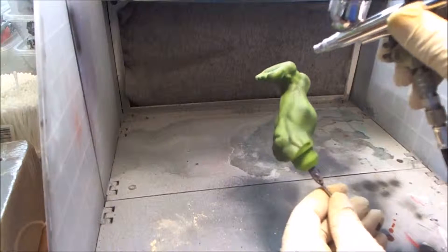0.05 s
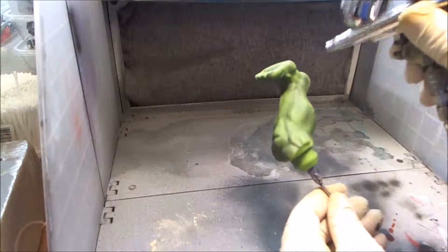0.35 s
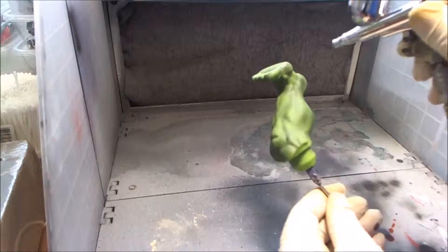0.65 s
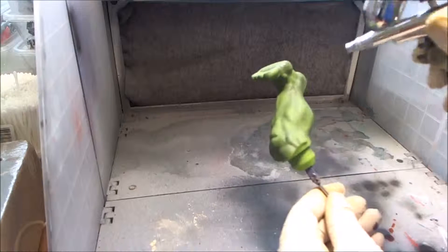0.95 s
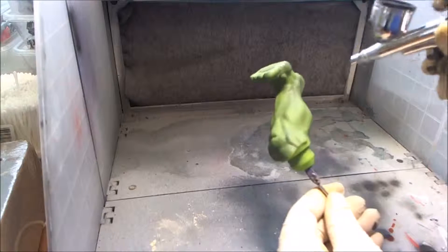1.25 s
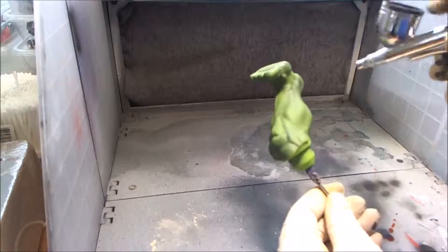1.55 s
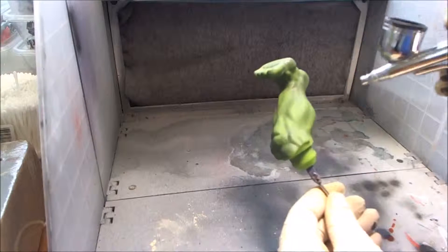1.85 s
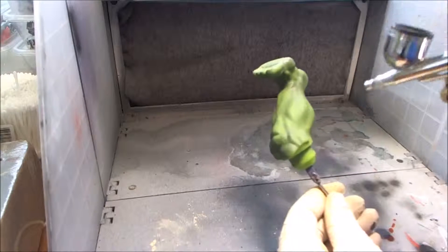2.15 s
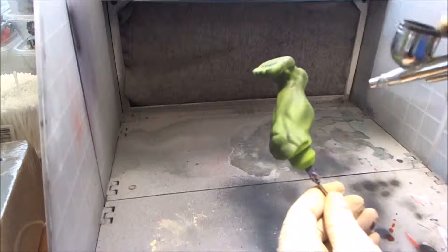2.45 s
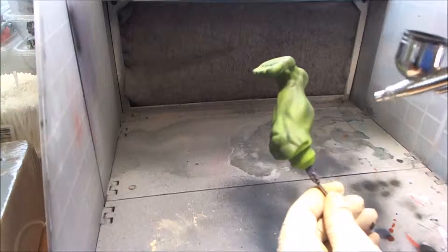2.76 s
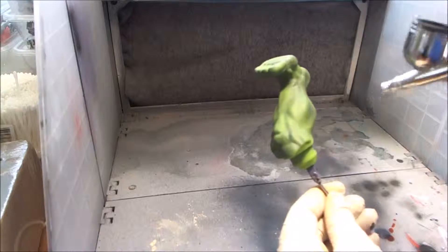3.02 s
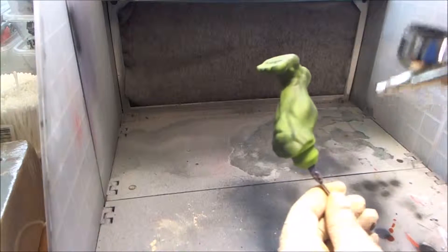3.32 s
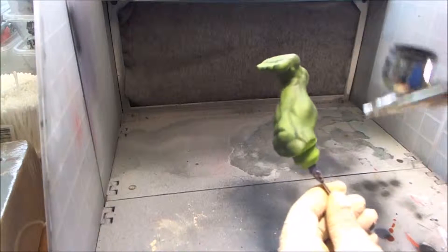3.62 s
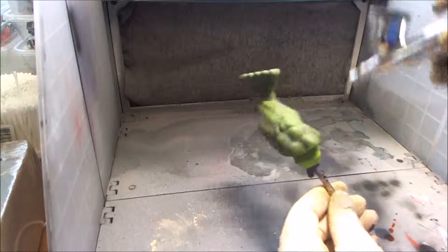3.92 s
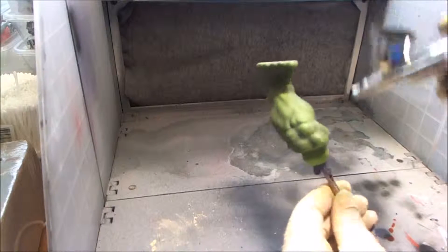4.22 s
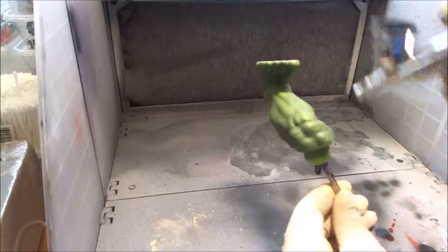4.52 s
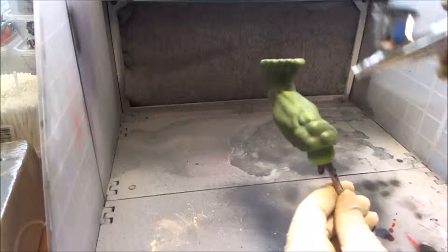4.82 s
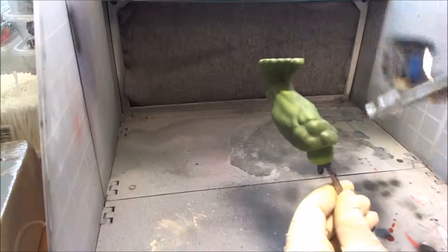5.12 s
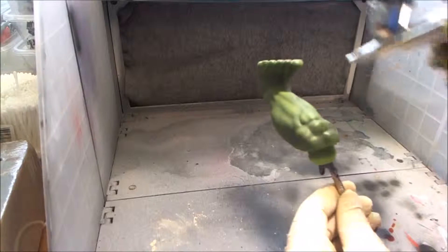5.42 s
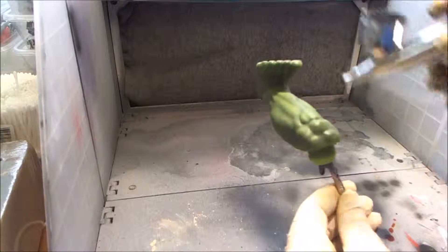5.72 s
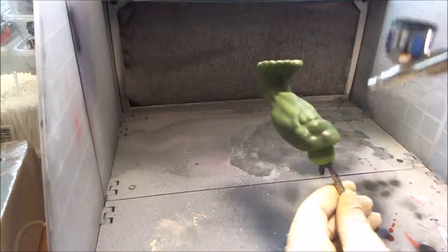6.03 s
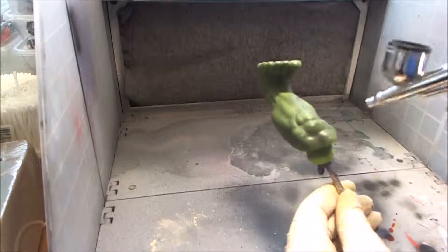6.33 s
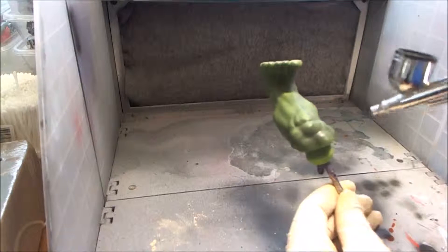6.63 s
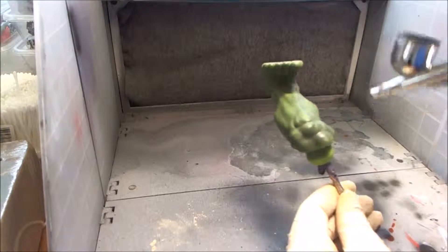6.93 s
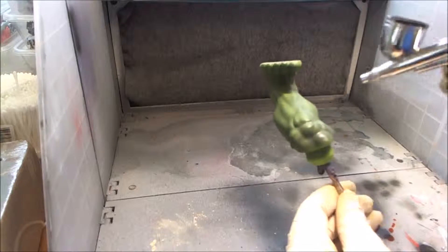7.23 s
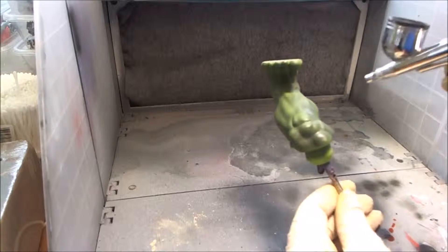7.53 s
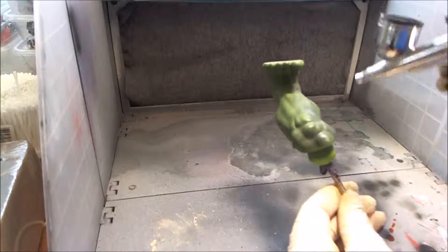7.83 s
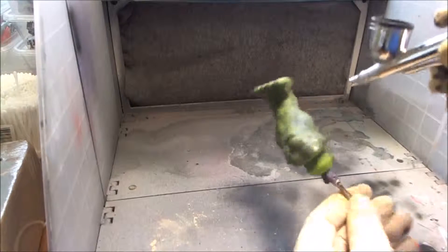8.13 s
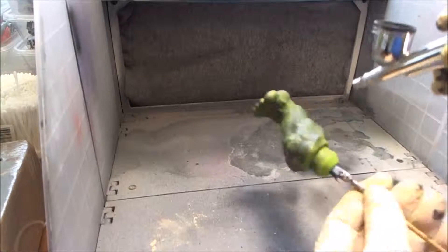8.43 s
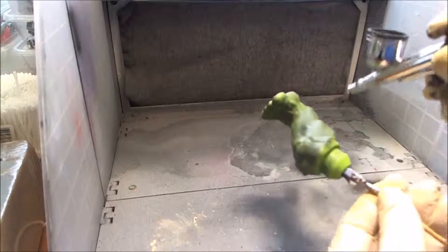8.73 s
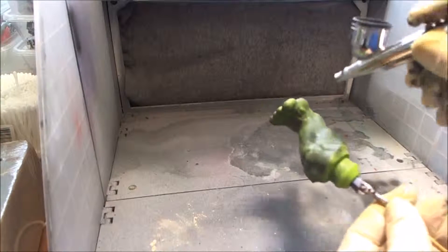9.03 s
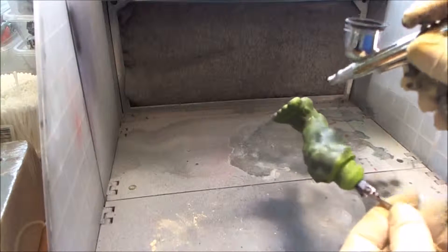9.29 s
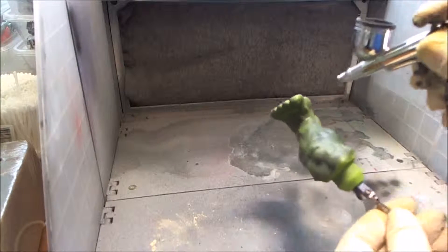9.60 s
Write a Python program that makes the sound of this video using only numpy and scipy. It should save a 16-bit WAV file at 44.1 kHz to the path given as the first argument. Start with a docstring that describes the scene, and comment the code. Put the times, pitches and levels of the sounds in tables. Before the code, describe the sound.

A small fan hums with one constant tone while an airbrush hisses close by, in broken bursts and then quick strokes.

```python
"""A hobby spray booth's fan runs throughout: a clean blade tone over air rumbling in box and duct.
In front of it an airbrush hisses over a model figure, coloured by echoes from the booth walls.
At first the trigger is rocked, so the hiss keeps breaking, and three times it spits as it reopens.
Midway come quick strokes, most adding a lower rush and a broad splash as the jet meets the figure.
Then the jet lingers at the figure's edge, and at the end it comes back onto it."""
import sys
import numpy as np
from scipy import signal
from scipy.fft import rfft, irfft
from scipy.io import wavfile
from scipy.ndimage import map_coordinates

SR = 44100
rng = np.random.default_rng(int(sys.argv[2]) if len(sys.argv) > 2 else 0)


def dump(signal):
    """Clip the signal to [-1, 1] and save it as 16-bit WAV at the path in sys.argv[1]."""
    limited = np.clip(np.atleast_2d(signal).T, -1, 1)
    pcm = np.round(limited * 32767).astype(np.int16)
    wavfile.write(sys.argv[1], SR, pcm)


N = 426006
TIME = np.arange(N) / SR
FREQS = np.maximum(np.fft.rfftfreq(N, 1 / SR), 1)

# hiss of the jet in open air: (frequency [Hz], base level [dB per Hz])
JET_SPECTRUM = [(3400, -107), (4050, -118), (4700, -115), (5100, -93), (5600, -88.5), (6200, -78.5),
                (7200, -76), (8600, -74.5), (9400, -72.5), (9900, -78.5), (11950, -78.5), (12100, -97.5),
                (14500, -95), (15200, -104)]
# rush of the jet over the figure and the walls: (frequency [Hz], base level [dB per Hz])
RUSH_SPECTRUM = [(600, -101), (1200, -73), (1410, -87), (1570, -72), (1850, -73.5), (2250, -73),
                 (2460, -74), (2630, -104), (2820, -85), (3100, -75.5), (3380, -73), (3700, -78),
                 (4050, -89.5), (4450, -116), (7000, -112)]
# hollow spaces that the rush makes ring: (frequency [Hz], width [Hz], boost [dB])
CAVITY_PEAKS = [(1311, 16, 7), (1395, 26, 8), (2018, 55, 2.5), (2229, 50, 3.5), (2739, 44, 5),
                (3497, 24, 2)]
# splash of air when the jet hits the figure squarely: (frequency [Hz], base level [dB per Hz])
SPLASH_SPECTRUM = [(1450, -112), (1750, -96), (2250, -98), (2750, -87.5), (3400, -95), (4000, -87.5),
                   (4450, -123), (4680, -116), (5000, -98.5), (5550, -101), (6200, -99), (7250, -85),
                   (8000, -108)]
# the jet starts on the figure, drifts to its edge and comes back: (time [s], rush boost [dB])
AIM_PATH = [(0, 3), (1.0, -3), (3.5, -4), (7.5, -2.5), (8.5, -4.5), (9.0, 1), (9.25, 0), (9.66, 2)]
# strokes across the figure:
# (time [s], half length [s], rush boost [dB], jet boost [dB], added notch depth [0-1])
HAND_STROKES = [(0.08, 0.12, 1, 2, .6), (0.436, 0.066, 1.5, 1, 0.3), (2.0, .1, 0, -0.5, 0.4),
                (3.27, 0.082, 0, 0.5, .55), (3.65, 0.066, 3, 1.8, 0.6), (4.137, 0.13, 3.5, 2, 0.65),
                (4.67, 0.17, 3, 1.7, 0.6), (5.24, 0.12, 1.5, 1.5, 0.9), (5.583, 0.04, 3, 0, 0),
                (5.93, 0.11, 3, 2.5, 0.5), (6.27, 0.1, 4.5, 1.5, 0.3), (6.55, 0.13, 5.5, 2.5, 0.3),
                (6.807, 0.09, 7, 5.5, 0.3), (9.5, 0.19, 1.7, 1.5, 0)]
# a notch, or narrow gap in the hiss, that shifts with the nozzle: (time [s], frequency [Hz])
NOTCH_PATH = [(0.5, 6500), (1.9, 7500), (6.8, 7880), (9.4, 7550)]
# moments when the finger eases the trigger: (time [s], half length [s], drop in flow [dB])
TRIGGER_EASES = [(0.318, 0.018, 7), (0.55, 0.02, 6), (0.767, 0.017, 12), (0.972, .022, 7), (1.184, .02, 4),
                 (1.39, 0.017, 6), (1.595, .026, 6), (1.796, 0.013, 6), (2.003, .018, 3),
                 (2.533, 0.047, 16.5), (2.865, 0.009, 7), (3.607, 0.0085, 4), (5.235, 0.011, 6),
                 (6.677, 0.016, 5), (7.072, .01, 3), (7.71, 0.012, 6), (8.87, .012, 1)]
# spits as the nozzle opens again: (time [s], boost [dB])
SPIT_TIMES = [(1.015, -2), (2.029, 1.5), (2.588, 2.5)]
# coarser hiss of the spits: (frequency [Hz], base level [dB per Hz])
SPIT_SPECTRUM = [(4500, -105), (5800, -87), (7100, -69), (9300, -75), (11500, -80), (12500, -104)]
# brief flares of the highest treble: (time [s], half length [s], boost [dB])
FLARE_TIMES = [(0.782, .018, 0), (2.482, .03, -3), (5.032, 0.016, 3), (6.98, .017, -1)]
# thin hiss of the flares: (frequency [Hz], base level [dB per Hz])
FLARE_SPECTRUM = [(10500, -115), (12300, -84), (14500, -83), (15000, -105)]
# tones of the fan wheel, loudest from its 20 blades: (multiple of the shaft speed [x], level [dB])
FAN_TONES = {1: -61, 3: -60.5, 20: -30, 40: -69}
# hum of the motor: (multiple of the mains frequency [x], level [dB])
HUM_TONES = {1: -62, 2: -59.5}
# rumble of swirling air behind the blades: (frequency [Hz], base level [dB per Hz])
RUMBLE_SPECTRUM = [(10, -80), (30, -84), (70, -77), (100, -69.5), (150, -67.5), (210, -61.5), (300, -57.5),
                   (400, -55), (540, -54.5), (690, -61.5), (850, -66.5), (1180, -75.5), (1400, -96),
                   (4000, -114)]
# pitches at which the air in booth and duct rings: (frequency [Hz], width [Hz], boost [dB])
DUCT_PEAKS = [(175.3, 8.1, 6), (202.3, 17, 6.5), (239.2, 13.2, 10), (274, 37, 2.5), (312, 9.9, 0.5),
              (327.8, 24, 10), (371.7, 3.9, 9), (646, 13, 3), (737.5, 31, 8), (956, 30, 4)]
# faint hiss of air drawn through the filter mat: (frequency [Hz], level [dB per Hz])
FILTER_MAT_SPECTRUM = [(4700, -126), (5200, -110), (6500, -102), (11500, -101), (12500, -106),
                       (15000, -110)]


def airbrush(sputter_db=1.15):
    """A jet of air hisses, sputters as paint tears off the needle, and strikes the figure."""
    rush_db, jet_db, notch_depth = hand_sweep()
    trigger_db = trigger()
    jet = noise(spectrum(JET_SPECTRUM)) * gain(jet_db + trigger_db + sputter_db * wander(36))
    impact = jet_on_figure(rush_db, trigger_db)
    hiss = notch(jet + spits() + keen_edge(), notch_depth)
    return booth_echoes(hiss, strength=1.1, count=5) + booth_echoes(impact, strength=1.05, count=8)


def hand_sweep(jet_base_db=-3, jet_share=0.069):
    """The hand's slow aim plus its quick strokes set the rush level, jet level and notch depth."""
    aim_db = np.interp(TIME, *np.transpose(AIM_PATH))
    strokes = sum(np.outer(sizes, swell(at, half, squareness=6)) for at, half, *sizes in HAND_STROKES)
    rush_db, jet_db, notch_depth = strokes
    return aim_db + rush_db, jet_base_db + jet_share * aim_db + jet_db, notch_depth


def trigger(rebound_share=0.24, rebound_s=0.07):
    """Change of flow in dB: it drops as the trigger is eased and overshoots as it comes back."""
    return sum(db * (rebound_share * swell(at + rebound_s, half) - swell(at, half))
               for at, half, db in TRIGGER_EASES)


def jet_on_figure(rush_db, trigger_db, splash_growth=2.4, trigger_share=0.14, flutter_db=0.86):
    """Air rushes over the figure; the splash grows faster than the rush as the jet hits squarely."""
    rush = noise(spectrum(RUSH_SPECTRUM) + peaks(CAVITY_PEAKS)) * gain(rush_db)
    splash = noise(spectrum(SPLASH_SPECTRUM)) * gain(splash_growth * rush_db)
    return (rush + splash) * gain(trigger_share * trigger_db + flutter_db * wander(15))


def spits(half_s=0.0077):
    """Paint gathered on the needle blows off in short, soft-edged puffs."""
    puffs = sum(gain(db) * swell(at, half_s) for at, db in SPIT_TIMES)
    return noise(spectrum(SPIT_SPECTRUM)) * puffs


def keen_edge(start_hz=4940, rise_hz_per_s=300, fade_db_per_s=15):
    """The first stroke adds a narrow hiss that glides up and fades as the nozzle draws away."""
    band = moving_band(noise(-76), start_hz + rise_hz_per_s * TIME, width_hz=450)
    return band * gain(-fade_db_per_s * TIME)


def notch(hiss, added_depth, resting_depth=0.16):
    """One narrow band of the hiss cancels, more deeply close to the figure."""
    centre_hz = np.interp(TIME, *np.transpose(NOTCH_PATH))
    band = moving_band(hiss, centre_hz, width_hz=930)
    return hiss - np.clip(resting_depth + added_depth, 0, 1) * band


def booth_echoes(spray, strength, count, first_s=0.0014, last_s=0.016, sway_s=0.0001722):
    """Close walls add echoes; their delays shift as the hand moves, so the tone colour wanders."""
    delays = np.geomspace(first_s, last_s, count)
    echoes = sum((-1) ** k * delayed(spray, delay + sway_s * wander(0.8))
                 for k, delay in enumerate(delays))
    return (spray + strength * echoes / np.sqrt(count)) / np.sqrt(1 + strength ** 2)


def treble_flares():
    """Short, thin flares at the very top of the hiss."""
    flares = sum(gain(db) * swell(at, half, squareness=6) for at, half, db in FLARE_TIMES)
    return noise(spectrum(FLARE_SPECTRUM)) * flares


def fan_tones(shaft_hz=21.853, mains_hz=50, drift_share=0.00027, waver_db=0.3):
    """The blades and the slightly unbalanced wheel sound as they turn; the motor hums with the mains."""
    turns = np.cumsum(shaft_hz * (1 + drift_share * wander(1))) / SR
    wheel = tones(turns, FAN_TONES) * gain(waver_db * wander(7))
    return wheel + tones(mains_hz * TIME, HUM_TONES)


def fan_air(buffet_db=0.58):
    """Swirling air makes booth and duct ring; the filter mat hisses faintly."""
    rumble = noise(spectrum(RUMBLE_SPECTRUM) + peaks(DUCT_PEAKS)) * gain(buffet_db * wander(9.1))
    return rumble + noise(spectrum(FILTER_MAT_SPECTRUM))


def gain(db):
    """Turn decibels into a number to multiply the sound by."""
    return 10 ** (np.asarray(db) / 20)


def spectrum(points):
    """Join (frequency [Hz], level [dB]) points; past the last, fall by 20 dB an octave."""
    hz, db = np.transpose(points)
    return np.interp(np.log(FREQS), np.log(hz), db) - 20 * np.log2(np.maximum(FREQS / hz[-1], 1))


def peaks(resonances):
    """Bell-shaped boosts in dB around the pitches that ring."""
    return sum(db / (1 + (2 * (FREQS - hz) / width) ** 2) for hz, width, db in resonances)


def noise(db):
    """Noise with the given dB per Hz."""
    return irfft(rfft(rng.standard_normal(N)) * gain(db), N) * np.sqrt(SR / 2)


def tones(cycles, levels_db):
    """Pure tones that swing a whole number of times per cycle."""
    return sum(np.sqrt(2) * gain(db) * np.sin(2 * np.pi * (multiple * cycles + rng.random()))
               for multiple, db in levels_db.items())


def wander(rate_hz):
    """A random curve of typical size 1 that swings about rate_hz times a second."""
    steps = 2 * rate_hz * TIME
    points = rng.standard_normal(int(steps[-1]) + 2)
    curve = np.interp(steps, np.arange(len(points)), points)
    return (curve - curve.mean()) / curve.std()


def swell(at_s, half_s, squareness=2):
    """A smooth rise to 1 and fall around at_s; squareness 2 is a bell, more flattens the top."""
    return np.exp(-np.abs((TIME - at_s) / half_s) ** squareness)


def delayed(sound, delay_s):
    """The same sound a little later; the delay may change over time."""
    return map_coordinates(sound, [(TIME - delay_s) * SR], order=3, mode="mirror")


def moving_band(sound, centre_hz, width_hz):
    """Keep only the frequencies near a centre that may move."""
    carrier = np.exp(2j * np.pi * np.cumsum(centre_hz) / SR)
    bell = np.exp(-(2 * np.fft.fftfreq(N, 1 / SR) / width_hz) ** 2)
    shifted_down = np.fft.fft(sound / carrier)  # the centre now sits at 0 Hz
    return 2 * np.real(carrier * np.fft.ifft(shifted_down * bell))


def scene():
    """Fan and airbrush, heard close by at the mouth of the booth."""
    return (fan_tones() + fan_air() + airbrush() + treble_flares())[None]


def record(dry, top_hz=15450):
    """Cut away the treble above top_hz."""
    return signal.sosfilt(signal.ellip(8, 0.2, 70, top_hz, fs=SR, output="sos"), dry)


dry = scene()
out = record(dry)
dump(out)
```